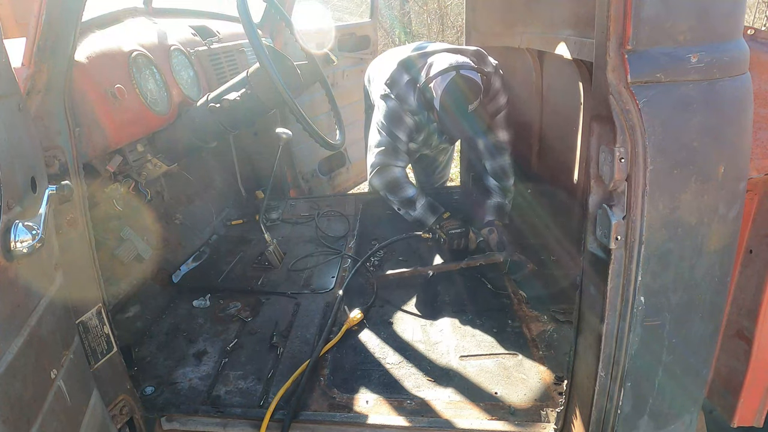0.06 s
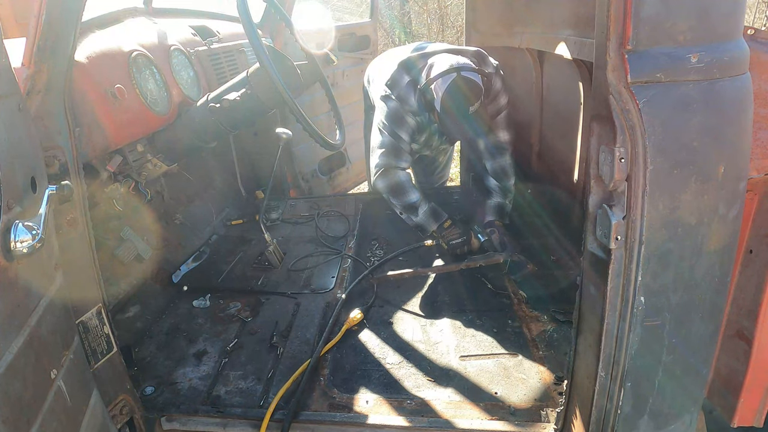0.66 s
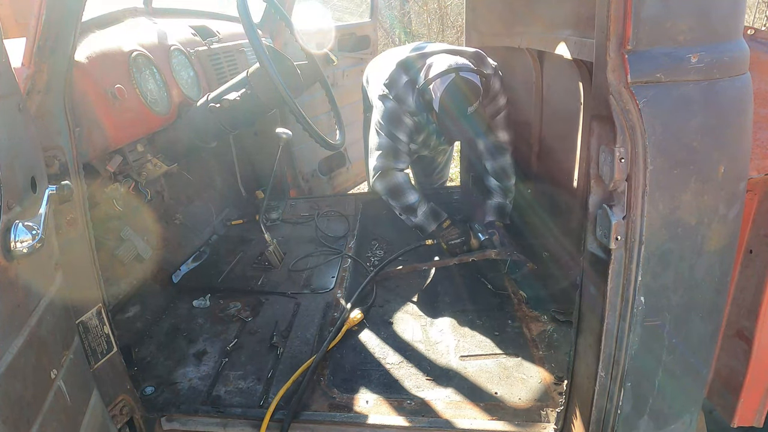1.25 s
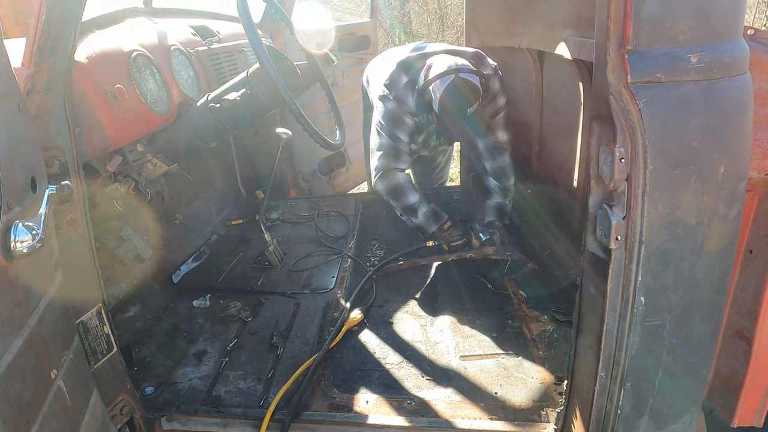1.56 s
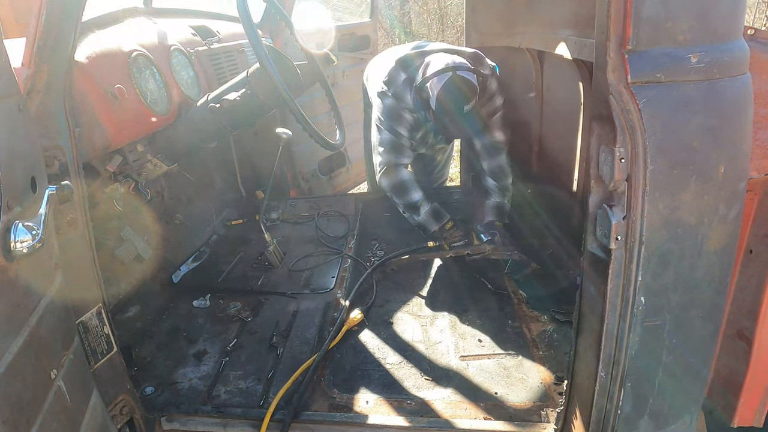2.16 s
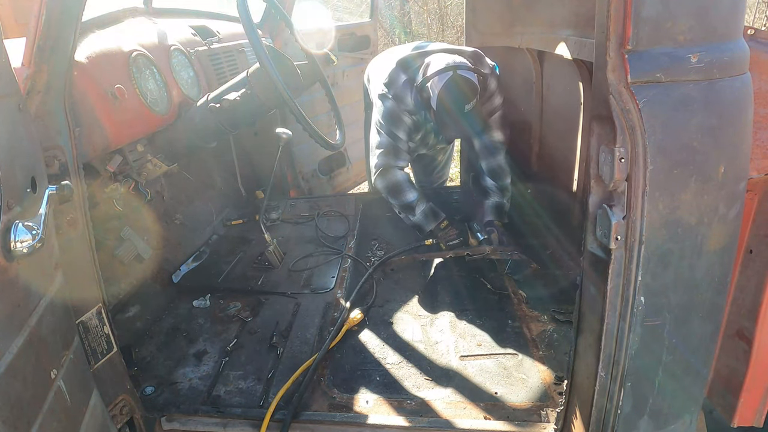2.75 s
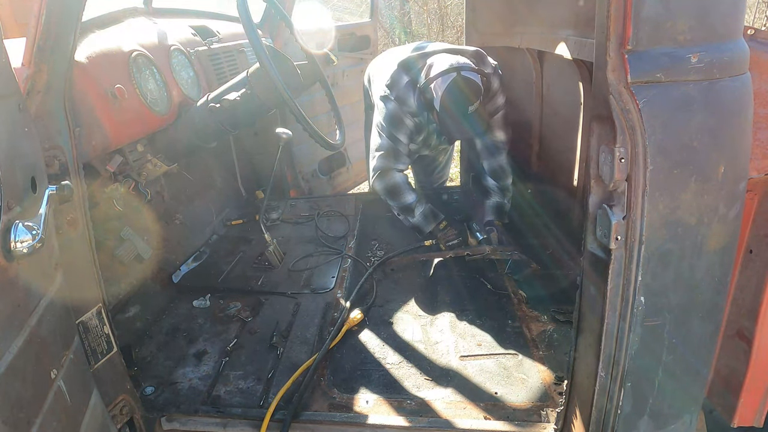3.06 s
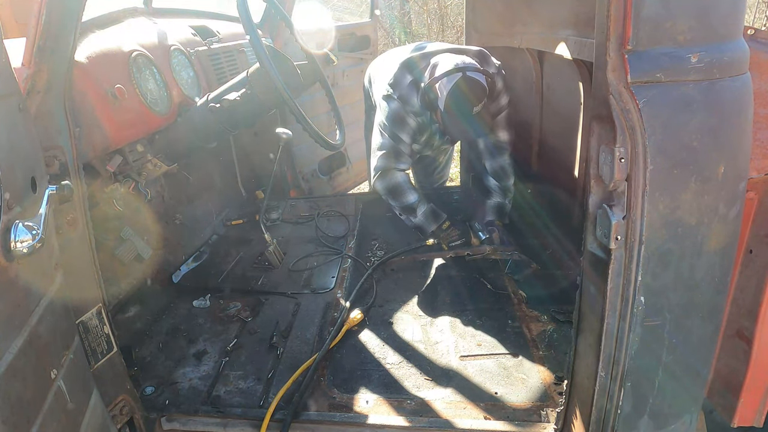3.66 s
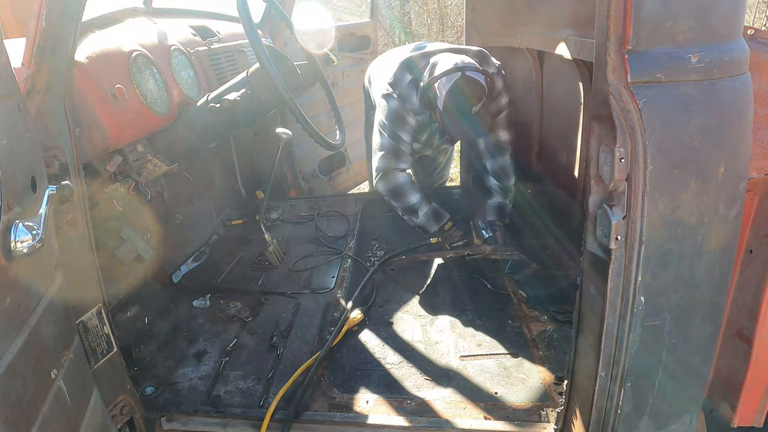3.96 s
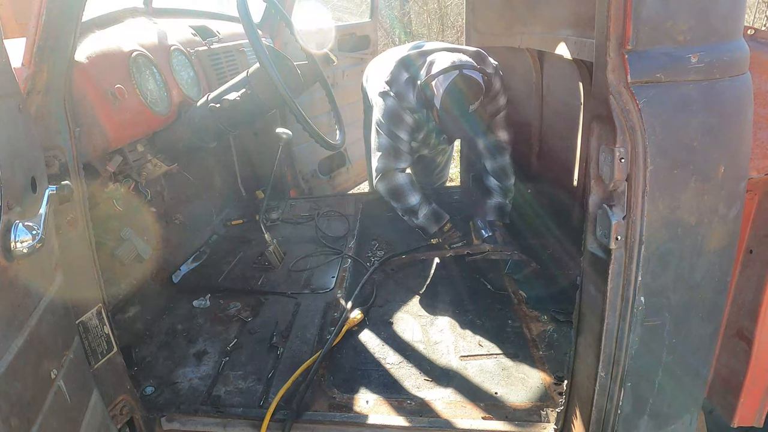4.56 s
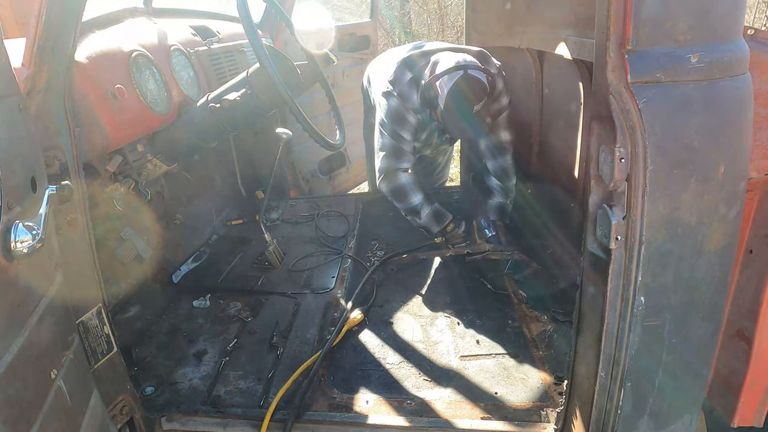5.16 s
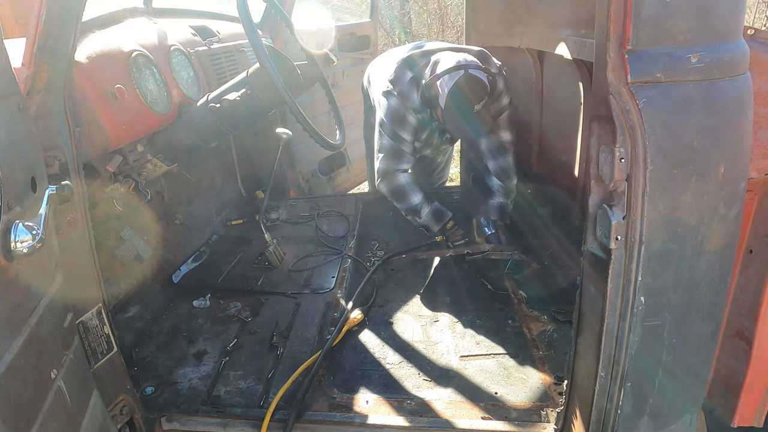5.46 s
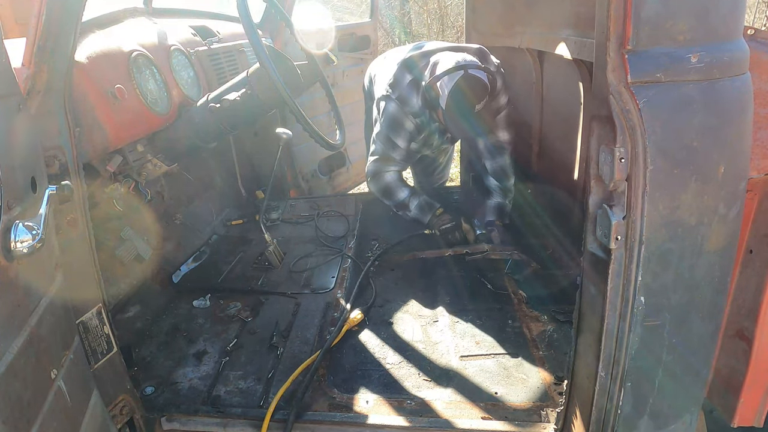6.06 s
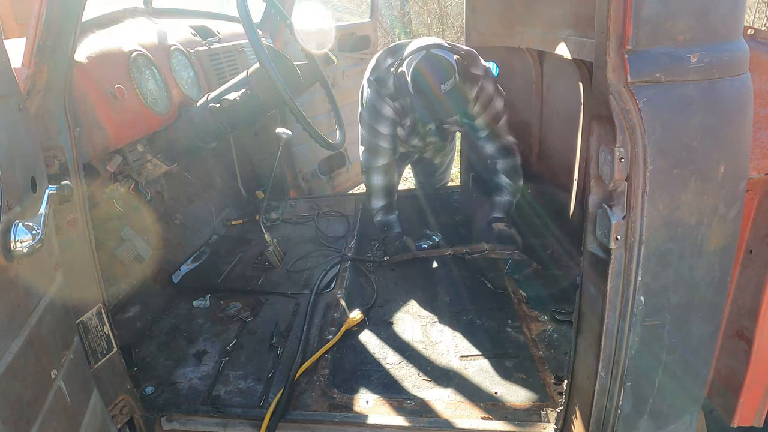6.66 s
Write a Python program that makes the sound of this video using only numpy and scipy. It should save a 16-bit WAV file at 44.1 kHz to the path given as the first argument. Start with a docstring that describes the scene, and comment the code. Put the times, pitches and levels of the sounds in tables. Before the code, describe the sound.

Inside a bare steel truck cab, a tool scrapes and knocks on the floor, then an air hammer rattles loudly into the sheet metal, booming and clanging with a hiss of air. It winds down, and light knocks and clinks fill a pause. A brief squeak leads into a second burst, followed by a hard clank and some scraping. The cab rings closely around each sound, over a low workshop rumble.

```python
"""Air hammer in a truck cab

An air hammer chisels spot welds out of the sheet-steel floor of a bare cab, in two bursts.
Each piston blow makes the floor boom, clang and crack and the bit ring; loose sheet chatters
between blows and the exhaust hisses. Around the bursts the tool is slid and knocked about on the
floor. The steel cab rings on after every sound, over a low workshop rumble."""
import sys
import numpy as np
from scipy import signal
from scipy.fft import rfft, irfft
from scipy.io import wavfile
from scipy.ndimage import uniform_filter1d

SR = 44100
rng = np.random.default_rng(int(sys.argv[2]) if len(sys.argv) > 2 else 0)


def log_audio(samples):
    """Write samples as a 16-bit WAV file to the path given in sys.argv[1]."""
    # one column per channel
    frames = np.atleast_2d(samples).T
    # limit to full scale, then quantise
    limited = np.clip(frames, -1, 1)
    pcm = np.round(limited * 32767).astype(np.int16)
    wavfile.write(sys.argv[1], SR, pcm)


N = 300321
T = np.arange(N) / SR

# trigger pulls: (air on [s], piston start [s], easing off [s], piston stop [s], air off [s],
# air level [dB], floor fade [dB/s])
BURSTS = [(0.697, .72, 2.377, 2.54, 2.41, -33.5, -0.5), (4.376, 4.4, 6.085, 6.125, 6.15, -30, 0.5)]
# tool and boots sliding on the floor: (start [s], length [s], level [dB], hardness [dB])
SLIDES = [(-.1, 0.69, -65, -9.5), (2.418, 0.25, -56.5, -0.5), (3.235, 1, -71.5, 6.5),
          (3.647, 0.72, -74, -12.5), (6.193, 0.18, -47, 8.5), (6.352, 0.69, -58, -7)]
# taps of the bit in its retainer: (time [s], level [dB])
CLINKS = [(3.69, -67), (3.779, -69), (4.054, -65), (4.246, -62.5)]
# crack spectrum of the cutting edge: (frequency [Hz], relative level [dB])
CRACK = [(100, -23), (600, -21), (1400, -4), (2100, 5), (2900, -0.5), (4000, 1.5), (5000, 1.5),
         (6200, -1.5), (7300, -1), (8600, -10), (10200, -10), (12300, -14), (14000, -20), (16000, -30)]
# stereo image: (frequency [Hz], side re direct [dB], left minus right [dB])
STEREO = [(50, -8, -1), (150, -34, -1.5), (350, -17, 0.5), (1004, -12, -0.5), (2180, -7.5, 0),
          (5120, -7.5, 0), (8000, -9.5, 3.5), (13000, -2, 1.5)]


def from_db(db):
    """Decibels to gain."""
    return 10 ** (np.asarray(db) / 20)


def in_time(rows):
    """A (time, value) curve at every sample."""
    return np.interp(T, *np.transpose(rows))


def at_hz(rows, hz):
    """Each column of a spectrum at the given frequencies."""
    points, *columns = np.transpose(rows)
    return [np.interp(np.log(hz + 1), np.log(points), c) for c in columns]


def since(s):
    """Seconds since a moment; zero before it."""
    return np.maximum(T - s, 0)


def struck(s, decay_s):
    """Envelope that jumps to 1 and dies away."""
    return (T >= s) * np.exp(-np.minimum(since(s) / decay_s, 20))


def held(start_s, end_s, fade_s=.08):
    """Envelope that fades in, holds and fades out."""
    return np.clip(np.minimum(T - start_s, end_s - T) / fade_s, 0, 1)


def grit(per_s, spread_db):
    """Tiny contacts of uneven size at random moments; rms 1."""
    contacts = (rng.random(N) < per_s / SR) * rng.standard_normal(N)
    contacts *= from_db(spread_db * np.clip(rng.standard_normal(N), -2, 2))
    return contacts / np.std(contacts)


def unit_energy(response):
    """Scale a response to keep the power of white noise."""
    return response / np.sqrt(np.sum(response ** 2))


def through(x, response):
    """Convolve with an impulse response."""
    return signal.oaconvolve(x, response)[:N]


def filtered(x, hz, kind):
    """Fourth-order Butterworth filter."""
    return signal.sosfilt(signal.butter(4, hz, kind, fs=SR, output="sos"), x)


def colour(spectrum, size=4096):
    """Minimum-phase impulse response with the given spectral shape."""
    db, = at_hz(spectrum, np.arange(size // 2 + 1) * SR / size)
    cepstrum = irfft(np.log(from_db(db)))
    return unit_energy(irfft(np.exp(rfft(2 * cepstrum[:size // 2], size))))


def resonances(modes):
    """Impulse response of damped modes set swinging by one push."""
    t = T[:SR // 2]
    rings = (from_db(db) * width_hz * np.exp(-np.pi * width_hz * t) * np.sin(2 * np.pi * hz * t)
             for hz, width_hz, db in modes)
    return unit_energy(sum(rings))


def body(force, modes, low_hz, top_hz):
    """A struck part: the contact carries little above top_hz, the part radiates little below low_hz."""
    softened = filtered(force, top_hz, "low")
    return through(filtered(softened, low_hz, "high"), resonances(modes))


def workshop():
    """Low steady room rumble, mostly common to both sides."""
    # rumble spectrum: (frequency [Hz], relative level [dB])
    spectrum = [(25, -26), (60, 2.5), (110, -6.5), (290, -9.5), (560, -25), (1050, -26.5), (1300, -30.5),
                (1900, -39.5), (4000, -50.5), (7000, -50.5), (9000, -60), (15000, -72.5)]
    mid, side = (through(white, colour(spectrum)) for white in rng.standard_normal((2, N)))
    return from_db(-48.5) * (mid + .12 * side * np.array([[1], [-1]]))


def cab(x, build_s):
    """Direct sound plus dense ringing of the steel shell, longer in the bass and wider in the treble."""
    # shell ringing: (frequency [Hz], t60 [s], band level re direct [dB])
    ringing = [(60.3, 0.3, 1), (162.6, 1.24, -5), (275, 0.74, -4), (417, 0.86, -3.5), (1043, 0.28, -3),
               (2900, 0.26, -6), (6990, 0.086, -9), (11750, 0.13, -19)]
    size = 2 * SR
    t, hz = T[:size], np.arange(size // 2 + 1) * SR / size
    edges_hz = np.geomspace(20, SR / 2, 21)
    white, tail = rfft(rng.standard_normal((2, size))), 0
    for low_hz, high_hz in zip(edges_hz, edges_hz[1:]):
        centre_hz = np.sqrt(low_hz * high_hz)
        t60_s, wet_db = at_hz(ringing, centre_hz)
        side_db, _ = at_hz(STEREO, centre_hz)
        mid, side = irfft(white * ((hz >= low_hz) & (hz < high_hz)))
        fall = unit_energy(from_db(-60 * t / t60_s) * (1 - np.exp(-t / build_s)))
        tail = tail + fall * (from_db(wet_db) * mid + from_db(side_db) * side * [[1], [-1]])
    return np.array([x + through(x, channel) for channel in tail])


def heave(force):
    """The cab shudders as a whole."""
    # cab modes: (frequency [Hz], width [Hz], level [dB])
    modes = [(34, 30, -1), (59, 20, 2), (85, 40, -5)]
    return body(force, modes, low_hz=22.5, top_hz=112)


def floor_pan(force):
    """The whole floor pan booms."""
    # pan modes: (frequency [Hz], width [Hz], level [dB])
    modes = [(134, 14, 3), (165, 18, 3.5), (216, 17.4, 2), (248, 20.4, 5), (284, 20, -2.5)]
    return body(force, modes, low_hz=118, top_hz=310)


def ribs(force):
    """Stiff ribs pressed into the floor drone above the boom."""
    # rib modes: (frequency [Hz], width [Hz], level [dB])
    modes = [(398, 27, 1), (425.7, 35, 2.5), (512, 38, -7.5), (570.6, 29.7, -1.5)]
    return body(force, modes, low_hz=377, top_hz=570)


def sheet(force):
    """The sheet around the cut clangs."""
    # sheet modes: (frequency [Hz], width [Hz], level [dB])
    modes = [(735, 28, -4.5), (800, 36, 0), (937, 30, 4), (1001, 38, -4), (1738, 21, -12), (1840, 32, -18)]
    return body(force, modes, low_hz=766, top_hz=2400)


def strip(force):
    """The lifted strip rings above the sheet."""
    # strip modes: (frequency [Hz], width [Hz], level [dB])
    modes = [(1116, 42, 0.5), (1189, 66, -1.5), (1307, 140, -5.5), (1490, 76, -13.5)]
    return body(force, modes, low_hz=994, top_hz=1480)


def torn_edge(force):
    """The ragged edge of the cut rasps."""
    # rasp spectrum: (frequency [Hz], relative level [dB])
    spectrum = [(700, -27), (1450, 3.5), (2000, 1.5), (2750, -2.5), (3300, -5), (5200, -7.5), (7000, -18.5),
                (16000, -46)]
    return through(force, colour(spectrum))


def bit(force):
    """The loaded bit rings briefly."""
    # loaded-bit modes: (frequency [Hz], width [Hz], level [dB])
    modes = [(1750, 50, -1), (2210, 100, 0), (2575, 65, .5), (3500, 130, -.5), (3850, 200, -7),
             (4610, 100, -8), (5500, 70, -1.5), (6110, 65, -8), (6880, 150, -7), (7890, 250, -10)]
    return body(force, modes, low_hz=1600, top_hz=9450)


def dragging():
    """Steel dragged over steel rings thinly."""
    # drag modes: (frequency [Hz], width [Hz], level [dB])
    modes = [(1295, 45, 4), (3830, 110, -9), (4081, 35, -8), (4900, 160, -10)]
    drag = sum(from_db(db - 3) * held(s, s + length_s) for s, length_s, db, _ in SLIDES)
    return through(drag * grit(per_s=7000, spread_db=9.5), resonances(modes))


def skids():
    """The tip sings briefly on one mode where it skids."""
    # skids: (time [s], level [dB], frequency [Hz])
    events = [(3.458, -58, 3510), (3.485, -47, 3550), (3.495, -53, 7900), (3.617, -42, 7850)]
    width_hz = 70
    rub = grit(per_s=12000, spread_db=4)
    return sum(through(from_db(db) * struck(s, decay_s=.01) * rub, resonances([(hz, width_hz, 0)]))
               for s, db, hz in events)


def clinks():
    """The bit rings freely when tapped in its retainer."""
    # free-bit modes: (frequency [Hz], level [dB], t60 [s])
    modes = [(4081, 3, .24), (4300, 0, .12), (4570, 2, .14), (4797, 0, .2), (5399, -2, .14),
             (5868, -3, .16), (7644, -5, .18), (10020, -9, .14)]
    taps = np.zeros(N)
    for s, db in CLINKS:
        taps[int(s * SR)] = from_db(db)
    t = T[:SR // 2]
    ring = sum(from_db(db - 60 * t / t60_s) * np.sin(2 * np.pi * hz * t) for hz, db, t60_s in modes)
    return through(taps, ring)


def rattle():
    """The bit rattles in its retainer at each clink."""
    shake = sum(from_db(db + 2.5) * struck(s, decay_s=.033) for s, db in CLINKS)
    return filtered(shake * grit(per_s=8000, spread_db=3) + 1e-18, hz=[3500, 9950], kind="band")


def squeak():
    """The air valve whistles briefly as the trigger is pulled for the second cut."""
    # squeak modes: (frequency [Hz], width [Hz], level [dB])
    modes = [(854, 28, 13), (1030, 68, 6), (5140, 400, -14), (8800, 270, -42.5)]
    peak_s, peak_db, rise_db_per_s, fall_db_per_s = 4.365, -29.5, 605, 90
    below_db = np.maximum(rise_db_per_s * (peak_s - T), fall_db_per_s * (T - peak_s))
    return from_db(peak_db - below_db) * body(rng.standard_normal(N), modes, low_hz=610, top_hz=11000)


def shrill():
    """The still loose bit shrills in its retainer as the second burst starts."""
    # loose-bit modes: (frequency [Hz], width [Hz], level [dB])
    modes = [(7500, 650, 0), (9630, 490, 6)]
    start_s = BURSTS[1][1]
    force = from_db(-26) * struck(start_s, decay_s=.065) * grit(per_s=6000, spread_db=4)
    return through(force, resonances(modes))


def spring_back():
    """The lifted strip clanks as it slips off the bit after the first cut."""
    force = from_db(-38) * struck(s=2.645, decay_s=.03) * grit(per_s=4000, spread_db=3)
    return strip(force) + from_db(-19) * torn_edge(force)


def contact(db, hardness_db):
    """Force on pan, sheet and edge: the harder the contact, the less boom and the more crack."""
    return from_db([[db + 11 - hardness_db], [db], [db - 8 + hardness_db]])


def handling():
    """Knocks and slides sound the same floor, sheet and bit as the blows do."""
    # tool knocking on the floor: (time [s], level [dB], hardness [dB])
    events = [(0.198, -61.5, -4.5), (0.245, -50, -1), (0.386, -37.5, 3), (2.642, -49.5, -5),
              (2.768, -53.5, -5.5), (3.486, -58.5, 11), (3.612, -36.5, -1.5), (3.894, -54.5, -11),
              (4.361, -45.5, -6), (6.329, -21, 2), (6.426, -32, -4.5), (6.481, -45.5, 10),
              (6.648, -48, 7.5), (6.708, -72, -8), (6.795, -57.5, 6)]
    knocks = sum(contact(db, hard_db) * struck(s, decay_s=.028) for s, db, hard_db in events)
    slides = sum(contact(db, hard_db) * held(s, s + length_s) for s, length_s, db, hard_db in SLIDES)
    thump, clank, scrape = (force * grit(per_s=7000, spread_db=1) for force in knocks + slides)
    scrape = filtered(scrape, hz=8960, kind="low")
    boom = floor_pan(filtered(thump, hz=306, kind="low"))
    low = boom + from_db(-9.5) * ribs(thump) + from_db(-11) * heave(thump)
    middle = from_db(2.5) * sheet(clank) + from_db(-2.5) * strip(clank) + from_db(-7) * torn_edge(clank)
    return low + middle + through(scrape, colour(CRACK)) + from_db(-27) * bit(scrape)


def trigger():
    """Columns of the latest trigger pull, at every sample."""
    rows = np.array(BURSTS)
    return rows[np.maximum(np.searchsorted(rows[:, 0], T) - 1, 0)].T


def exhaust():
    """Air hisses out from just before the piston starts until the valve shuts."""
    # hiss spectrum: (frequency [Hz], relative level [dB])
    spectrum = [(100, -32.5), (800, 13), (2000, 1.5), (4000, 0), (7300, 4), (9000, -8), (12000, -14),
                (16000, -29)]
    opening_s, shut_db_per_s = .014, 527
    on_s, _, _, _, off_s, air_db, _ = trigger()
    flow = np.minimum(since(on_s) / opening_s, 1) * from_db(air_db - shut_db_per_s * since(off_s))
    return flow * through(rng.standard_normal(N), colour(spectrum))


def spin_up(start_s):
    """Share of full speed the piston has reached."""
    return np.interp(since(start_s), [0, .09], [.55, 1])


def seating():
    """Grip of the tip: 0 while it skates and tears, 1 while it is seated on a weld."""
    # seated spans: (start [s], end [s])
    spans = [(.93, 1.46), (4.52, 5.19), (5.29, 6.3)]
    return sum(held(start_s, end_s, fade_s=.096) for start_s, end_s in spans)


def freeing():
    """How far the weld has given way in the second burst, 0 to 1."""
    start_s, length_s = 5.05, .65
    return np.minimum(since(start_s) / length_s, 1)


def chatter():
    """Share of loose slapping at the cut: less once the tip seats, least once the weld gives."""
    loose, seated, freed = .74, .38, .22
    firm = seated + (freed - seated) * freeing()
    return loose + (firm - loose) * seating()


def bounce():
    """Share of loose slapping in the floor: high until the tool settles into an even buzz."""
    # even runs: (start [s], end [s])
    spans = [(1.36, 2.6), (5.68, 6.3)]
    bouncing, even = .6, .18
    settled = sum(held(start_s, end_s, fade_s=.096) for start_s, end_s in spans)
    return bouncing + (even - bouncing) * settled


def floor_drive_db(surge_db):
    """The full hose gives an early surge; the level then drifts, and runs down as the trigger eases."""
    surge_at_s, surge_s, run_down_db_per_s = .12, .16, 117.5
    _, start_s, easing_s, *_, fade_db_per_s = trigger()
    surge = np.exp(-np.abs(since(start_s) - surge_at_s) / surge_s)
    return surge_db * surge - fade_db_per_s * since(start_s) - run_down_db_per_s * since(easing_s)


def edge_drive_db():
    """Edge and bit run down faster than the floor as the trigger eases."""
    run_down_db_per_s = 227.5
    _, _, easing_s, *_ = trigger()
    return -run_down_db_per_s * since(easing_s)


def piston(jitter_s, uneven_db):
    """One click per blow, each a little off in time and force; mean power about 1 while running."""
    # speed as the hose pressure sags, one curve per burst: (time [s], rate [blows/s])
    speeds = [
        [(0.72, 64), (1.0, 66), (1.27, 65.5), (1.38, 61.2), (1.65, 60.2), (1.9, 57), (2.05, 56.4), (2.17, 57.8),
         (2.45, 56)],
        [(4.4, 60), (4.68, 64.5), (4.82, 61), (5.03, 62.3), (5.2, 58.8), (5.45, 56.2), (5.62, 56.3),
         (5.8, 53.1), (6.12, 52.4)],
    ]
    clicks = np.zeros(N)
    for speed, (_, start_s, _, stop_s, *_) in zip(speeds, BURSTS):
        rate_hz = in_time(speed) * spin_up(start_s)
        running = (T >= start_s) & (T < stop_s)
        strokes = np.cumsum(rate_hz * running) / SR
        at = np.flatnonzero(np.diff(np.ceil(strokes)))
        late, force = rng.standard_normal((200, 2))[:len(at)].T
        shift = (late * jitter_s * SR).astype(int)
        clicks[at + shift] = np.sqrt(SR / rate_hz[at]) * from_db(uneven_db * force)
    return clicks


def after_blows(clicks, rise_s, decay_s):
    """Envelope that swells at each blow and dies away, with the power of the clicks."""
    power = clicks ** 2 + 1e-18
    for pole in np.exp(-1 / (SR * np.array([rise_s, decay_s]))):
        power = signal.lfilter([1 - pole], [1, -pole], power)
    return np.sqrt(power)


def blow(clicks, loose, torn, tear_s):
    """Clean impact, a spray of tearing metal, then loose sheet slapping; loose and torn share power."""
    tear = after_blows(clicks, rise_s=.00085, decay_s=tear_s) * grit(per_s=14000, spread_db=-.5)
    slaps = after_blows(clicks, rise_s=.00035, decay_s=.024) * grit(per_s=3500, spread_db=1.5)
    impact = np.sqrt(1 - torn) * clicks + np.sqrt(torn) * tear
    return np.sqrt(1 - loose) * impact + np.sqrt(loose) * slaps


def steady(x):
    """The tool delivers even power on or off a resonance: level to rms 1, with a gain of 2 at most."""
    return x / np.sqrt(np.maximum(uniform_filter1d(x ** 2, size=SR // 14), .25))


def floor_boom(clicks):
    """Blows shake pan, ribs and cab, more weakly until the piston is up to speed."""
    _, start_s, *_ = trigger()
    level_db = -18.5 + floor_drive_db(surge_db=4) - 20 * (1 - spin_up(start_s))
    thrust = blow(clicks, loose=bounce(), torn=.04, tear_s=.004)
    recoil = blow(clicks, loose=.97, torn=.05, tear_s=.004)
    boom = from_db(-1.5 * freeing()) * steady(floor_pan(thrust))
    drone = from_db(-6.5 - 4 * seating()) * steady(ribs(thrust))
    shudder = from_db(-12.5) * steady(heave(recoil))
    return from_db(level_db) * (boom + drone + shudder)


def floor_clang(clicks):
    """Blows ring sheet and strip; the strip fades as the weld gives way."""
    level_db = -24 + floor_drive_db(surge_db=2.5)
    push = blow(clicks, loose=.55 * chatter() ** 2, torn=.28, tear_s=.002)
    lift = blow(clicks, loose=.6 * chatter() ** 2, torn=.4, tear_s=.0012)
    sheet_ring = from_db(-2 * freeing()) * steady(sheet(push))
    strip_ring = from_db(-4.5 + 3.5 * seating() - 17 * freeing()) * steady(strip(lift))
    return from_db(level_db) * (sheet_ring + strip_ring)


def edge_crack(clicks):
    """Metal cracks and tears at the cutting edge; a seated tip rasps less."""
    # crack strength, one curve per burst: (time [s], level [dB])
    curves = [
        [(0.73, -22), (0.87, -20.5), (0.944, -24.5), (1.4, -25.5), (1.428, -22.5), (2.37, -23)],
        [(4.41, -26), (4.428, -28.5), (4.498, -18), (4.59, -23.5), (5.3, -22.5), (5.7, -23.5), (6.08, -27)],
    ]
    level_db = in_time(np.vstack(curves)) - 4.5 + edge_drive_db()
    cut = blow(clicks, loose=chatter(), torn=1, tear_s=.0022)
    rip = blow(clicks, loose=chatter(), torn=1, tear_s=.004)
    rasp = from_db(1 - 13 * seating()) * torn_edge(rip)
    return from_db(level_db) * (through(cut, colour(CRACK)) + rasp)


def tip(force):
    """The tip sings out as it breaks through the last of the weld."""
    # tip modes: (frequency [Hz], width [Hz], level [dB])
    modes = [(3530, 120, 0), (3850, 150, -10)]
    peak_s, peak_db, fade_db_per_s = 5.98, -28.5, 70
    swell = from_db(peak_db - fade_db_per_s * np.abs(T - peak_s))
    return swell * body(force, modes, low_hz=3100, top_hz=4500)


def bit_ring(clicks):
    """Blows ring bit and tip; the bit rings more when seated and as the weld gives way."""
    level_db = -36 + 5.5 * seating() + 2.5 * freeing() + edge_drive_db()
    jab = blow(clicks, loose=.25 * chatter(), torn=.2, tear_s=.0008)
    return from_db(level_db) * steady(bit(jab)) + tip(jab)


def hammer():
    """At each piston blow the floor gives first; edge and bit sound a moment later."""
    edge_lag_s = .0018
    clicks = piston(jitter_s=.00016, uneven_db=1.2)
    at_edge = np.roll(clicks, int(edge_lag_s * SR))
    return floor_boom(clicks) + floor_clang(clicks) + edge_crack(at_edge) + bit_ring(at_edge)


def scene():
    """Hammer, handling and exhaust sound inside the cab, over the workshop rumble."""
    small = dragging() + skids() + clinks() + rattle() + squeak() + shrill() + spring_back()
    return cab(hammer() + handling() + small + exhaust(), build_s=.00086) + workshop()


def record(dry):
    """Left and right differ a little in colour, peaks are rounded and the top is cut."""
    ceiling, cutoff_hz = .9, 15800
    _, balance_db = at_hz(STEREO, np.arange(N // 2 + 1) * SR / N)
    coloured = irfft(rfft(dry) * from_db(balance_db * np.array([[.5], [-.5]])), N)
    rounded = ceiling * np.tanh(coloured / ceiling)
    return signal.sosfilt(signal.ellip(10, .1, 80, cutoff_hz, fs=SR, output="sos"), rounded)


dry = scene()
out = record(dry)
log_audio(out)
```